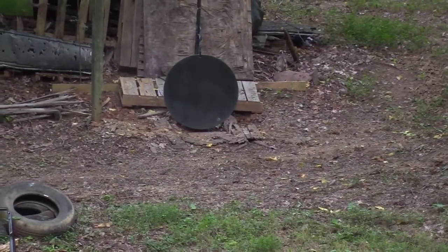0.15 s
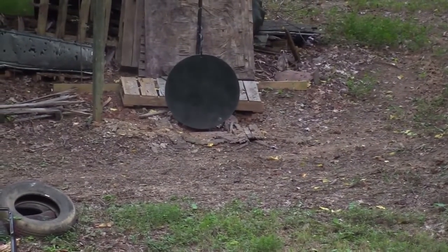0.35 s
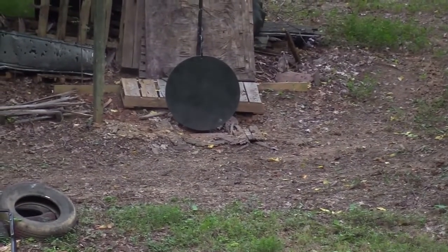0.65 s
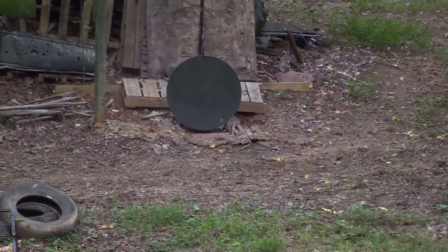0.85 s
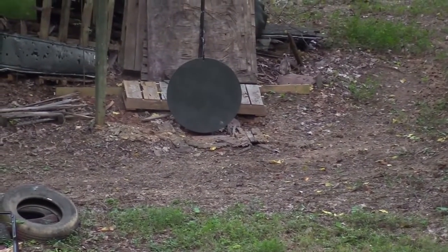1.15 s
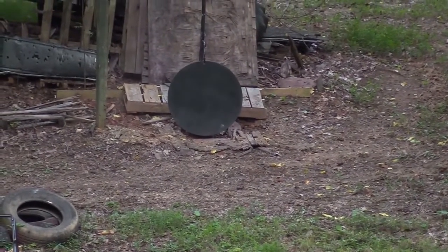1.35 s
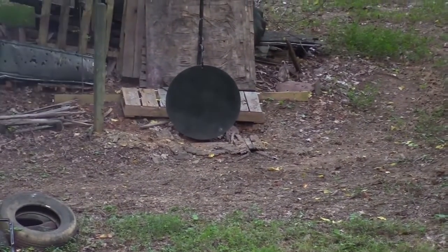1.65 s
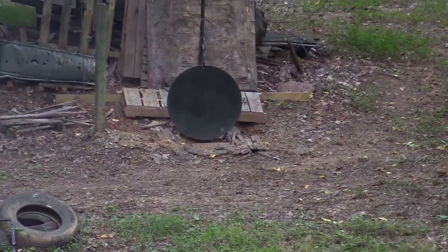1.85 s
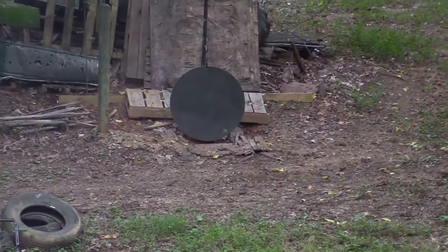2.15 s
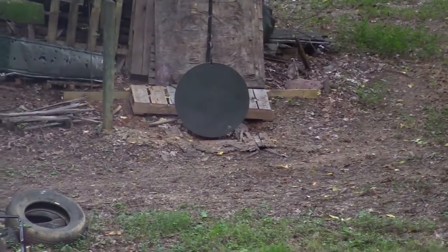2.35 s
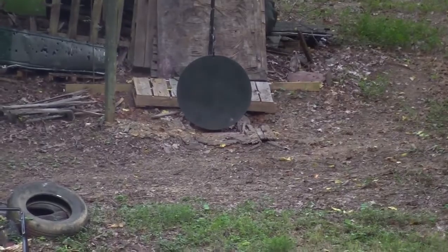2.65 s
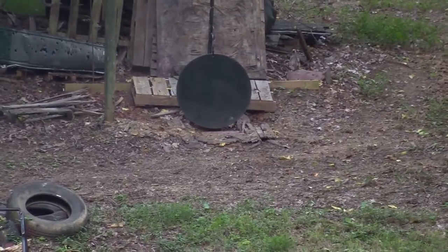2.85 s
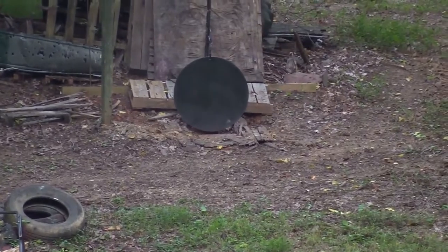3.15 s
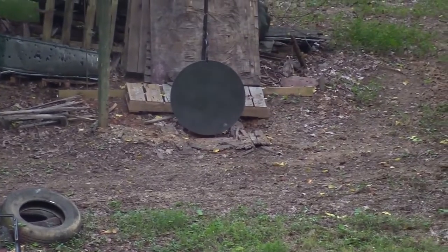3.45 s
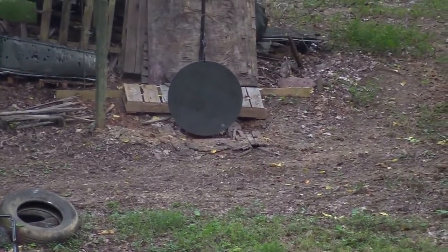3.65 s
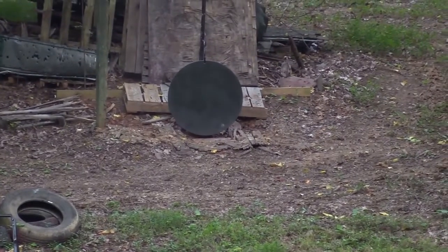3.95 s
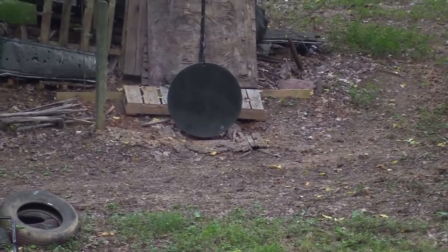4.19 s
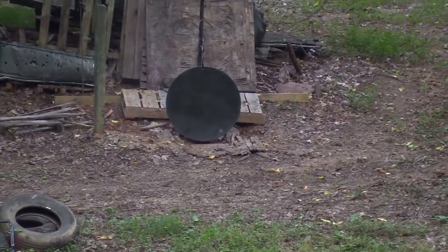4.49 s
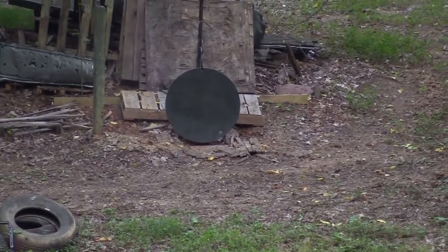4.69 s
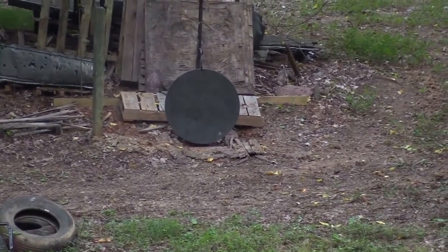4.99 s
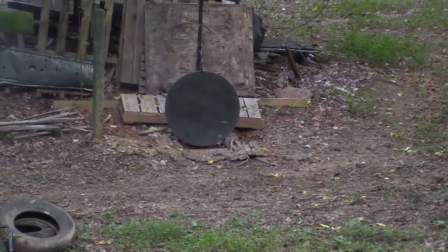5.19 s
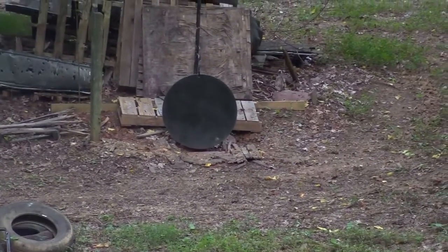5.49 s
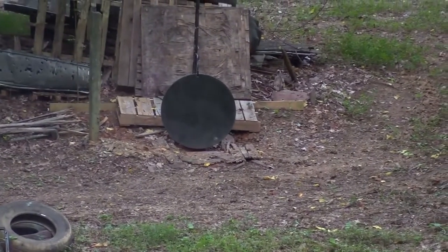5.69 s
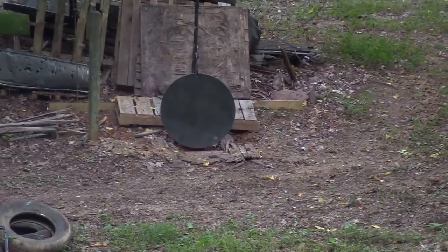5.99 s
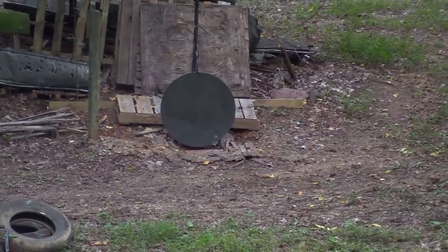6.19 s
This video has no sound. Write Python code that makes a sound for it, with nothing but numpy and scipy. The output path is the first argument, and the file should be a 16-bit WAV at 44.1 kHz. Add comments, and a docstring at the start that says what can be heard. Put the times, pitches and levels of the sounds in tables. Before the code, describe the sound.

Quiet wooded outdoor range with faint high insect chirping, low air rumble and a tiny distant bird peep. A very close pistol shot overloads the microphone, its dense echo held loud before fading through the trees. An ejected brass case clatters with bright ticks about a second later. A second similar shot follows, with another long echo and two more case ticks near the end.

```python
"""Two close pistol shots overload a microphone input on a wooded outdoor range.
Each is a shock wave followed by scattered, decaying noise: the long echo from ground and trees.
Gain control holds that echo level before it dies away; damped modes form the ring of bouncing brass cases.
Shaped noise makes the chirping insects, a far drone and quiet outdoor air; a falling sine is a small far bird."""
import sys
import numpy as np
from scipy import signal
from scipy.fft import rfft, irfft
from scipy.io import wavfile
from scipy.ndimage import uniform_filter1d

SR = 44100
rng = np.random.default_rng(int(sys.argv[2]) if len(sys.argv) > 2 else 0)


def digitize_waveform(pressure):
    """Quantize a signal to 16-bit integers and store it at the path in sys.argv[1].

    Rows of a 2-D input are taken as channels; values are limited to [-1, 1].
    """
    field = np.atleast_2d(pressure).T
    bounded = np.clip(field, -1, 1)
    quanta = np.round(bounded * 32767).astype(np.int16)
    wavfile.write(sys.argv[1], SR, quanta)


N = 279153
TIME = np.arange(N) / SR
BINS = np.fft.rfftfreq(N, 1 / SR)

# pistol shots, ahead of the gain control: [t/s, blast level/dB, echo level/dB]
SHOTS = [(1.5640, 33, 13), (5.1942, 32.5, 12)]


def gain_of(db):
    """Level definition: 20 dB is a factor of ten in amplitude."""
    return 10 ** (np.asarray(db) / 20)


def evened(x):
    """Mean-square normalization: scales a signal to rms 1."""
    return x / np.sqrt(np.mean(x ** 2) + 1e-20)


def read(points, hz):
    """Interpolation of a spectral table along a logarithmic frequency axis."""
    f, value = np.transpose(points)
    return np.interp(np.log(hz + 1), np.log(f + 1), value)


def add(mix, s, sound):
    """Linear superposition of a stereo sound from time s."""
    part = mix[:, round(s * SR):][:, :sound.shape[-1]]
    part += sound[..., :part.shape[1]]


def panned(x, side_db):
    """Interchannel level difference: leans a sound to the left by side_db."""
    return x * gain_of(np.array([[side_db], [-side_db]]) / 2)


def noise(level_db, same):
    """Partial coherence: stereo noise of rms 1 with a given spectral shape and left-right likeness."""
    left, other = rfft(rng.standard_normal((2, N)))
    same = np.clip(same, -1, 1)
    right = same * left + np.sqrt(1 - same ** 2) * other
    return evened(irfft(np.array([left, right]) * gain_of(level_db), N))


def wander(slow_hz, fast_hz):
    """Superposed slow sines of random phase form an irregular curve of rms 1."""
    t = np.linspace(0, N / SR, num=2000)
    rates_hz = np.geomspace(slow_hz, fast_hz, 20)
    curve = sum(np.sin(2 * np.pi * (f * t + rng.random())) / np.sqrt(f) for f in rates_hz)
    return np.interp(TIME, t, evened(curve))


def pistol():
    """Impulse and response: each blast excites the wood; the trees stand still, so one echo answers both."""
    out, answer = np.zeros((2, N)), echo()
    for s, blast_db, echo_db in SHOTS:
        add(out, s, gain_of(blast_db) * blast())
        add(out, s + 0.0049, gain_of(echo_db) * answer)
    return out


def blast(crack_db=-3, crack_s=0.0012):
    """Shock propagation: bullet crack, muzzle blast and one hard reflection, all first at the left port."""
    # spectral shape of the bullet's crack: [f/Hz, level/dB per Hz]
    crack_shape = [(150, -46), (700, -11), (2000, -5.5), (4000, -4), (6500, 0.5), (9500, -6.5), (14000, -2),
                   (16000, -8.5), (18000, -24)]
    # hard reflection of the blast: [delay/s, length/s, size relative to the blast before its low-pass]
    hard_reflection = (.0082, .00017, 2.1)
    blast_delay_s, blast_push_s = .0017, .00267  # delay behind the crack, length of the push
    port_hz = 72  # bass limit of the microphone
    right_delay_s = .00012
    t = TIME[:SR // 8] - np.array([[0], [right_delay_s]])
    crack = noise(read(crack_shape, BINS), 0.64)[:, :t.shape[1]]
    crack = gain_of(crack_db) * crack * (t > 0) * np.exp(-abs(t) / crack_s)
    delay_s, length_s, size = hard_reflection
    reflection = size * signal.lfilter(*signal.butter(2, 1300, fs=SR), shock(t - delay_s, length_s))
    wave = crack + shock(t - blast_delay_s, blast_push_s) + reflection
    # the microphone passes no steady pressure
    return signal.lfilter(*signal.butter(1, port_hz, "high", fs=SR), wave)


def shock(t, length):
    """Blast-wave law: a jump in pressure, then a longer suction."""
    u = np.maximum(t, 0) / length
    return (t > 0) * (1 - u) * np.exp(-u)


def echo(build_s=0.0063, far_db=-12.5, far_slow=1.727, far_late_s=1.27, far_hz=1600, patch_db=0.9,
         trunk_db=-6, trunks_per_s=600, merge_s=0.25):
    """Diffuse scattering from ground and trees: treble dies first; far slopes add a dull, slow roll."""
    # spectral shape of the echo at its start: [f/Hz, level/dB per Hz]
    echo_shape = [(30, -36.5), (90, -11.5), (170, -10), (300, -0.5), (500, 1.5), (750, 5), (1050, 1.5),
                  (1500, -6), (2100, -5.5), (3000, -10), (5000, -12), (8000, -13), (12000, -19.5),
                  (16000, -20.5)]
    # near reverberation, time to fall by 60 dB: [f/Hz, t60/s]
    echo_t60 = [(60, 1.01), (160, 1.32), (350, 1.88), (800, 1.685), (2000, 1.573), (4000, 1.298),
                (7000, 1.11), (10000, .9), (15000, 0.68)]
    # coherence of the diffuse wash: [f/Hz, left-right likeness]
    echo_same = [(60, 0.86), (300, 0.83), (1400, 0.86), (3100, 0.72), (5000, 0.51), (8000, 0.36),
                 (15000, 0)]
    colour_db = read(echo_shape, BINS)
    wash = noise(colour_db, read(echo_same, BINS))
    # near trunks send back separate sharp cracks, which soon merge into the wash
    trunks = rng.standard_normal(N) * (rng.random(N) < trunks_per_s / SR)
    trunks = evened(irfft(rfft(trunks) * gain_of(colour_db), N)) * np.exp(-TIME / merge_s)
    hz, t, z = signal.stft(wash + gain_of(trunk_db) * trunks, SR, nperseg=512, noverlap=384)
    fall_db = -60 * t / read(echo_t60, hz)[:, None]
    far = gain_of(far_db + fall_db / far_slow) / (1 + (hz[:, None] / far_hz) ** 2)
    far = far * (1 - np.exp(-(t / far_late_s) ** 3))  # the far slopes answer late
    # irregular patches over frequency and time
    patches = uniform_filter1d(rng.standard_normal(fall_db.shape), size=20, axis=0)
    patches = evened(uniform_filter1d(patches, size=3, axis=1))
    z = z * np.hypot(gain_of(fall_db), far) * gain_of(patch_db * patches)
    tail = signal.istft(z, SR, nperseg=512, noverlap=384)[1][:, :N]
    return panned(tail * (1 - np.exp(-TIME / build_s)), -0.92)


def cases():
    """Impact excitation: thrown-out cases tick on a hard surface and ring until they touch again."""
    # touches: [t/s, tick level/dB, ring level/dB, squareness from 0 glancing to 1 flat on, lean to left/dB]
    touches = [(2.4832, -13, -22, 0.17, -4), (2.4927, -9.5, -28.5, 0.85, -4),
               (2.6937, -22.5, -31.5, .02, -8.5), (2.7312, -42, -51, .02, -2), (2.803, -68, -49, .02, -10),
               (6.0957, -17, -35, .02, -8), (6.2167, -9, -60, 1, .5)]
    # spectral shape of the tick: [f/Hz, level/dB per Hz]
    tick_shape = [(1000, -30), (3000, -8.5), (4500, -5.5), (8000, 0.5), (11000, -5), (15000, -5.5)]
    # one entry a case, in order of the shots: [pitch factor]
    case_pitch = [1, 1.132]
    out, t = np.zeros((2, N)), TIME[:SR // 2]
    grit = noise(read(tick_shape, BINS), 0.6)
    flights_s = np.diff([row[0] for row in touches] + [np.inf])
    for k, (s, tick_db, ring_db, square, side_db) in enumerate(touches):
        pitch = case_pitch[sum(shot[0] < s for shot in SHOTS) - 1]
        patch = np.roll(grit, k * len(t), axis=1)[:, :len(t)]
        touch = bounce(t, flights_s[k], patch, pitch, tick_db, ring_db, np.clip(square, 0, 1))
        add(out, s, panned(touch, side_db))
    return out


def bounce(t, free_s, grit, pitch, tick_db, ring_db, square, tick_s=0.0013, scatter_db=-30, scatter_s=0.041):
    """Modal excitation: the more squarely the case lands, the more it knocks and the more modes it wakes."""
    # modes of the brass wall before the pitch factor: [f/Hz]
    brass_hz = [7585, 10170, 10700, 12330, 14840]
    # ring of those modes, row for row, before ring_stretch: [level/dB, t60/s]
    brass_modes = [(3.5, 0.21), (0, 0.19), (1, 0.23), (-16, 0.4), (0, 0.19)]
    # modes of the hard surface: [f/Hz]
    surface_hz = [1930, 2800, 3720, 6000, 12700, 14700]
    # knock of those modes, row for row: [level/dB, t60/s]
    surface_modes = [(5.5, 0.012), (-4, 0.015), (1, 0.014), (-3, .008), (2, .008), (6, .008)]
    chatter_s, chatter_db = 0.0031, -5  # a glancing case touches again with its other end
    dull_hz, bright_hz = 10500, 19000  # treble edge of the tick: glancing, flat on
    knock_db, glance_db = -6.5, -28  # knock when flat on, and its change when glancing
    narrow_hz, wide_hz = 280, 10000  # spread of the ring over the modes: glancing, flat on
    tumble_hz, flutter_depth = 47, .3  # the case tumbles in the air and its ring flutters
    ring_stretch, choke_s = 1.15, .004  # factor on t60; the next touch chokes the ring

    again = (1 - square) * gain_of(chatter_db) * (t > chatter_s) * np.exp(-abs(t - chatter_s) / tick_s)
    tick = grit * (np.exp(-t / tick_s) + again + gain_of(scatter_db) * np.exp(-t / scatter_s))
    edge_hz = min(dull_hz + (bright_hz - dull_hz) * square, SR / 2 - 1)
    tick = signal.lfilter(*signal.butter(2, edge_hz, fs=SR), tick)

    knock = ring(zip(surface_hz, *np.transpose(surface_modes)), t).sum(0)
    knock = gain_of(knock_db + glance_db * (1 - square)) * knock

    mode_hz, (mode_db, mode_t60) = np.array(brass_hz), np.transpose(brass_modes)
    spread_hz = narrow_hz * (wide_hz / narrow_hz) ** square
    share = 1 / (1 + ((mode_hz - mode_hz[1]) / spread_hz) ** 4)  # strongest at the second mode
    flutter = 1 + flutter_depth * np.cos(2 * np.pi * (tumble_hz * t + rng.random((len(brass_modes), 2, 1))))
    modes = ring(zip(mode_hz * pitch, mode_db, mode_t60 * ring_stretch), t)
    brass = np.tensordot(share, flutter * modes, axes=1)
    choke = np.exp(-np.maximum(t - free_s, 0) / choke_s)
    return gain_of(tick_db) * (tick + knock) + gain_of(ring_db) * brass * choke


def ring(modes, t):
    """Free damped vibration: one row of dying sine a mode, with its own phase at each port."""
    return np.array([
        gain_of(db - 60 * t / t60) * np.sin(2 * np.pi * (hz * t + rng.random((2, 1)) / 4))
        for hz, db, t60 in modes])


def insects(skirt=1.4, glide_hz=45, waver_db=1):
    """Resonance and modulation: distant wings, blurred by the wood, swell and rise in pitch each chirp."""
    # chirping insects: [t of one chirp/s, chirps per second, centre f/Hz]
    chirps = [(.27, 3.68, 6780), (.41, 3.37, 6460), (.093, 5.79, 7760)]
    # their wing resonances, row for row: [width scale/Hz, mean level/dB, chirp depth scale/dB]
    wings = [(310, -58.2, 3.8), (270, -60.2, 2.8), (190, -69.5, 4.2)]
    out = np.zeros((2, N))
    for (beat, rate, hz), (width, db, depth_db) in zip(chirps, wings):
        wing = noise(-20 * skirt * np.log10(1 + (1.84 * (BINS - hz) / width) ** 2), 0.72)
        cycle = 2 * np.pi * rate * (TIME - beat)
        glide = np.exp(2j * np.pi * np.cumsum(glide_hz * np.sin(cycle)) / SR)
        wing = (signal.hilbert(wing) * glide).real  # shifts the whole band up and down
        level_db = db + depth_db * np.tanh(2 * np.cos(cycle)) + waver_db * wander(3.5, 57)
        out += wing * gain_of(level_db)
    return out


def bird(length_s=.055, wood_s=.2, wet=2.2):
    """Convolution with a decaying response: a thin falling peep lingers among the trees."""
    # peeps of a small far bird: [t/s, start f/Hz, end f/Hz, level/dB before the wood's response]
    peeps = [(.42, 6250, 5440, -61), (3.07, 6200, 5500, -62)]
    out, t = np.zeros((2, N)), np.arange(0, length_s, 1 / SR)
    for s, from_hz, to_hz, db in peeps:
        phase = 2 * np.pi * np.cumsum(np.linspace(from_hz, to_hz, len(t))) / SR
        peep = np.sin(phase) * np.sqrt(np.hanning(len(t)))
        wood = rng.standard_normal((2, SR // 2)) * np.exp(-TIME[:SR // 2] / wood_s)
        wood *= wet / np.linalg.norm(wood[0])
        wood[:, 0] += 1  # direct sound
        add(out, s, gain_of(db) * signal.fftconvolve(wood, peep[None], axes=1))
    return out


def air():
    """Broadband and narrow-band noise: gently swaying outdoor rumble, thin hiss and a far drone."""
    # spectral shape of the distant rumble: [f/Hz, level/dB per Hz]
    rumble_shape = [(20, -13), (50, -5), (80, 0.5), (115, -2), (160, -7), (240, -2), (330, -9.5),
                    (450, -11), (700, -8), (1000, -7.5), (1500, -13), (2200, -22.5), (3500, -35),
                    (8000, -60)]
    # coherence of the rumble: [f/Hz, left-right likeness]
    rumble_same = [(60, 0.63), (300, 0.8), (1400, 0.76), (3100, 0.47), (7000, 0.032), (15000, 0.037)]
    # spectral shape of the thin hiss: [f/Hz, level/dB per Hz]
    hiss_shape = [(1000, -4.5), (4000, -1), (5500, -0.5), (8200, 2), (10000, -3.5), (15000, -4),
                  (16000, -8.5)]
    # swelling tones of a faint far drone: [t of the peak/s, f/Hz, peak level/dB]
    drone = [(.2, 358.5, -61.5), (.47, 202, -57), (.7, 238, -58)]
    # the rumble slowly grows and drifts to the left
    start_db, rise_db_per_s, sway_db = -49.5, 0.82, 0.74
    start_side_db, side_rise_db_per_s = 0.2, .33
    hiss_db, swell_s = -60, 1.05  # level of the hiss; full length of each drone swell
    level_db = start_db + rise_db_per_s * TIME + sway_db * wander(0.473, 9.5)
    side_db = start_side_db + side_rise_db_per_s * TIME
    rumble = noise(read(rumble_shape, BINS), read(rumble_same, BINS))
    out = rumble * gain_of(level_db + np.array([side_db, -side_db]) / 2)
    out += gain_of(hiss_db) * noise(read(hiss_shape, BINS), .1)
    for s, hz, db in drone:
        swell = np.cos(np.pi * np.clip((TIME - s) / swell_s, -.5, .5))
        out += gain_of(db) * swell * noise(-20 * np.log10(1 + ((BINS - hz) / 6) ** 2), 1.0)
    return out


def scene():
    """Linear superposition of everything that reaches the microphone."""
    return pistol() + cases() + insects() + bird() + air()


def lag(x, seconds):
    """First-order relaxation: a one-pole smoother."""
    r = np.exp(-1 / (seconds * SR))
    return signal.lfilter([1 - r], [1, -r], x)


def overload(x):
    """Amplitude saturation: a firm knee just under full scale."""
    return .97 * x / (1 + x ** 8) ** (1 / 8)


def band_limit(x):
    """Linear-phase low-pass filtering: the recorder's steep treble edge."""
    edge_hz = 16100
    kernel = signal.firwin(255, edge_hz, window=("kaiser", 8), fs=SR)
    return signal.oaconvolve(x, kernel[None], "same")


def record(dry, limit_db=-9.5, recover_db=55, squeeze=1.0):
    """Delayed feed-forward gain control: the blast clips, then gain recovers along with the echo's fall."""
    sense_s, attack_s = .02, .0047
    power_db = 10 * np.log10(lag((dry ** 2).mean(0), sense_s) + 1e-12)
    # the held level can fall no faster than recover_db per second
    held_db = np.maximum.accumulate(power_db + recover_db * TIME) - recover_db * TIME
    ducked = dry * gain_of(-squeeze * lag(np.maximum(held_db - limit_db, 0), attack_s))
    # the coupling capacitor swings back after the long clipped suction
    coupled = signal.lfilter(*signal.butter(1, 11, "high", fs=SR), overload(ducked))
    return band_limit(np.clip(band_limit(coupled), -.95, .95))


dry = scene()
out = record(dry)
digitize_waveform(out)
```